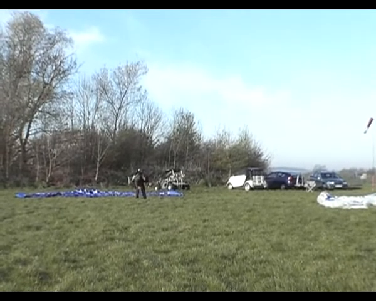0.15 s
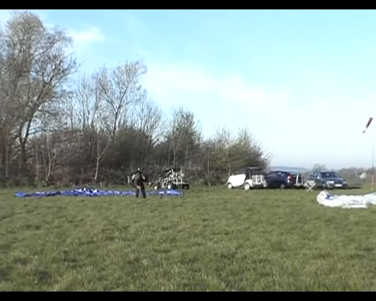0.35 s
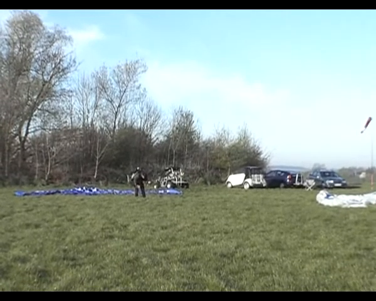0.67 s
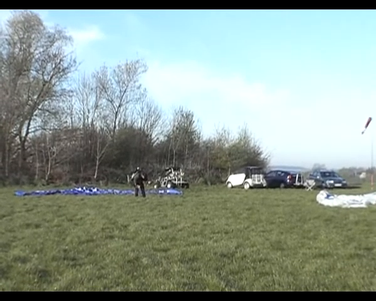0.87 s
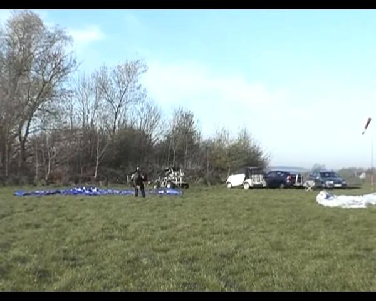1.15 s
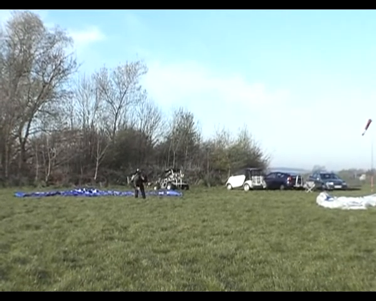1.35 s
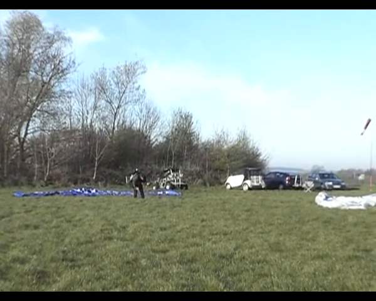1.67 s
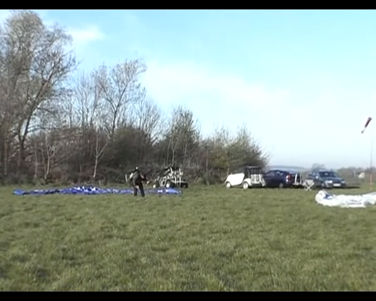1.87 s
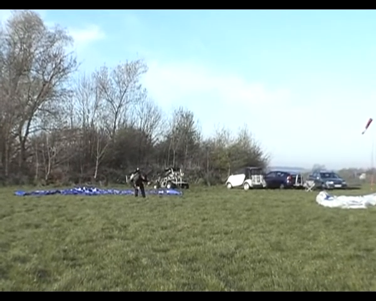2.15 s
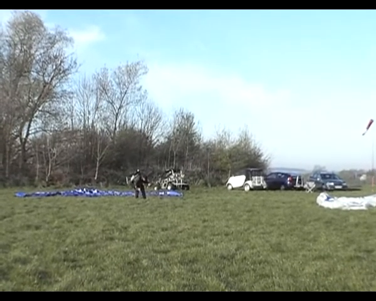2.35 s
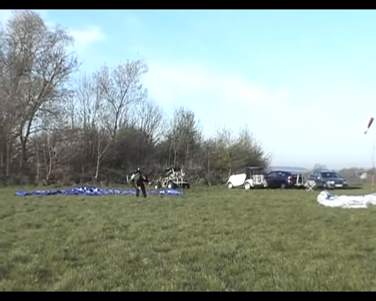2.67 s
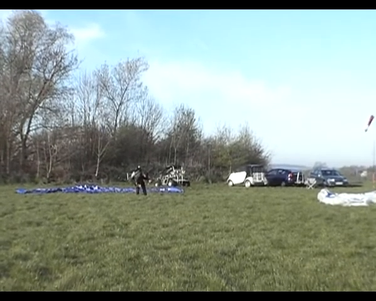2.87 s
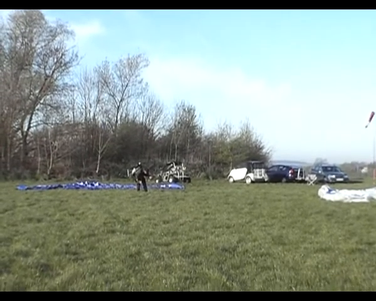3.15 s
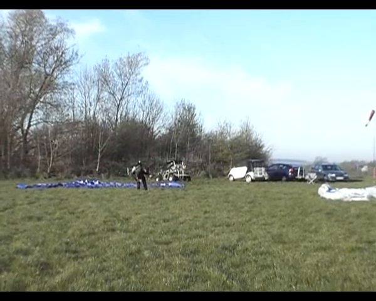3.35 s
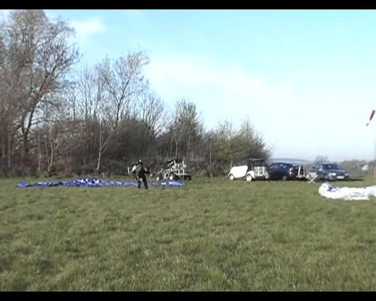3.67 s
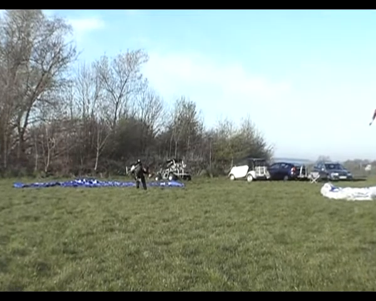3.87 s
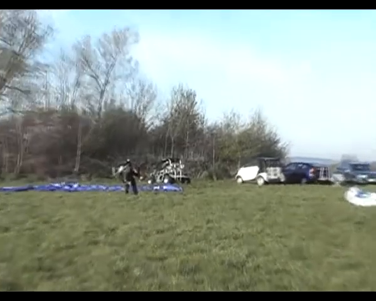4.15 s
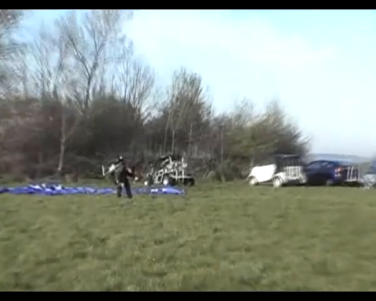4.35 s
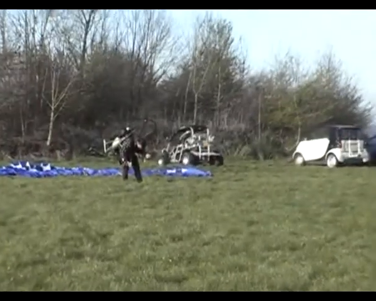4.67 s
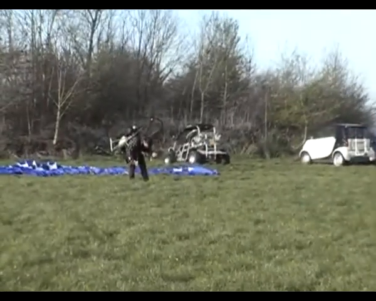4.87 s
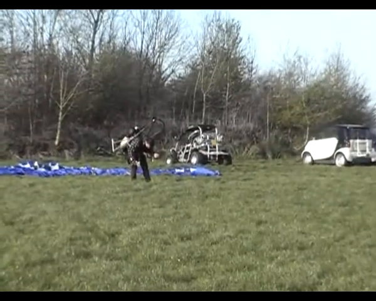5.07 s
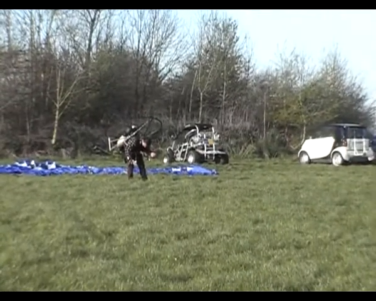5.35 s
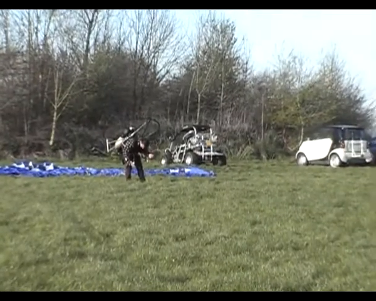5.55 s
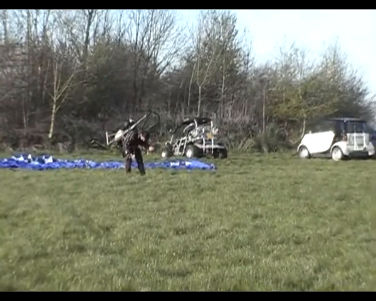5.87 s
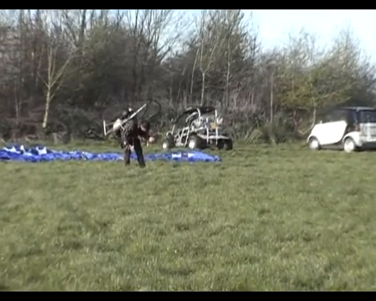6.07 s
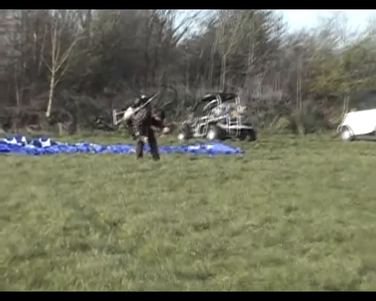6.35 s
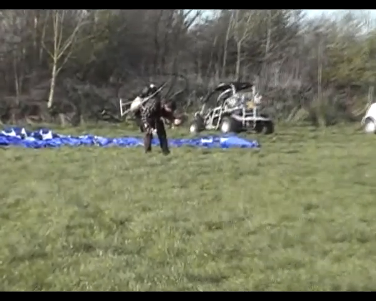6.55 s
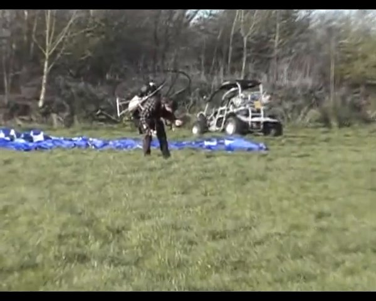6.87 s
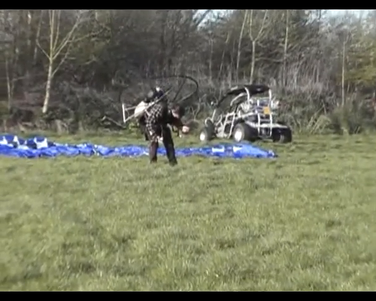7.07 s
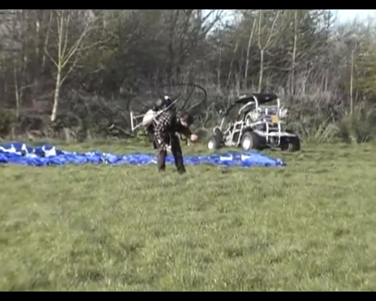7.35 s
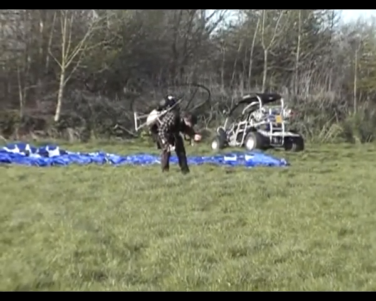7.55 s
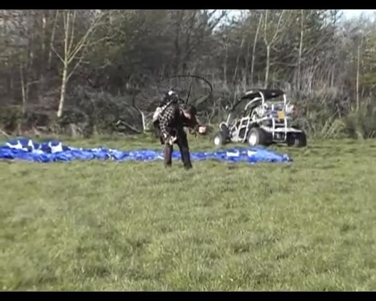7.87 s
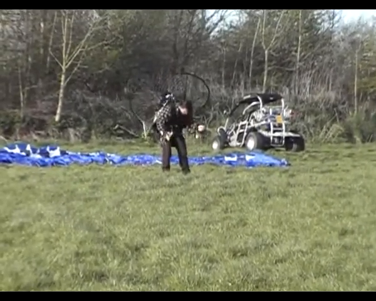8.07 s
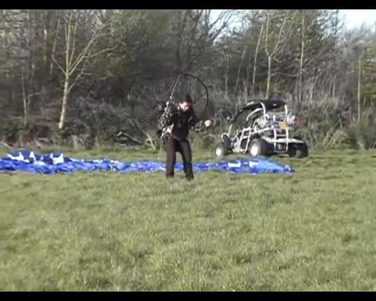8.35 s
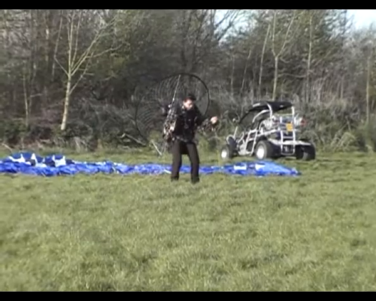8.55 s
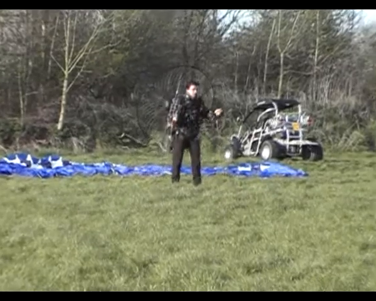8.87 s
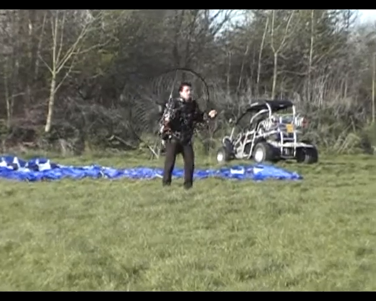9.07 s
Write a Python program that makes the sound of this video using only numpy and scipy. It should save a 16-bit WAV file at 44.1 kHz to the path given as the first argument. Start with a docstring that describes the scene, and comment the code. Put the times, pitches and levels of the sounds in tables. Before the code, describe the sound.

A small two-stroke paramotor buzzes across an open field, revs up in pushes, holds steady, then cuts out and rattles as it coasts down.

```python
"""The buzz of a two-stroke paramotor, chopped by the roar of its propeller, heard across an open field.
It runs at part throttle, is opened up in small pushes, held, then cut; the drive rattles as it coasts down.
One shaft speed drives it all: a stack of engine orders through exhaust resonances, tones at multiples of
the blade rate, noise throbbing with the shaft, a repeating gear growl, and struck modes for the rattle.
Behind lie propeller wash and the rush of the open air; a thin, resonant microphone housing colours all."""
import sys
import numpy as np
from scipy import signal
from scipy.fft import rfft, irfft, next_fast_len
from scipy.io import wavfile
from scipy.ndimage import uniform_filter1d

SR = 44100
rng = np.random.default_rng(int(sys.argv[2]) if len(sys.argv) > 2 else 0)


def log_audio(samples):
    """Write samples as a 16-bit WAV file to the path given in sys.argv[1]."""
    # one column per channel
    frames = np.atleast_2d(samples).T
    # limit to full scale, then quantise
    limited = np.clip(frames, -1, 1)
    pcm = np.round(limited * 32767).astype(np.int16)
    wavfile.write(sys.argv[1], SR, pcm)


N = 406591
TIME_S = np.arange(N) / SR

# drive: crank turns per propeller turn, blade count; crank speeds at which the throttle measure is 0 and 1
GEAR, BLADES = 3.6, 2
PART_HZ, FULL_HZ, CUT_S = 118, 157, 7.85
# crank speed (= firing rate) before the first push; fast and creeping response to each push
START_HZ, SPIN_UP_S, CREEP_S, CREEP_SHARE = 109.35, 0.326, 1.68, 0.172
# coasting: initial loss of speed; speed below which friction brakes more than air
BRAKE_HZ_PER_S, FRICTION_HZ = 233, 49.1
# acceleration at which the engine pulls hardest; floor between exhaust resonances
PULL_HZ_PER_S, VALLEY_DB = 13, -52
# level falls per halving of speed: unlit puffs; roar, hiss and gear growl only below their knees
PUMP_FALL_DB = 13
ROAR_KNEE_HZ, ROAR_FALL_DB = 114, 15
HISS_KNEE_HZ, HISS_FALL_DB = 127.2, 14
GEAR_KNEE_HZ, GEAR_FALL_DB = 132, 26
PUTTER_DEPTH = .15
# band limit of the microphone channel
TOP_HZ = 11900

# throttle pushes: (time [s], crank speed eventually gained [Hz])
THROTTLE_PUSHES = [(0, 5.89), (0.206, 3.69), (1.329, 1.7), (1.785, 11.06), (1.981, 16.36), (2.199, 10.82)]
# how far the pilot has turned the engine: (time [s], turn [0-1])
ENGINE_HEADING = [(4.4, 0), (5.4, 0.35), (6.7, 1)]
# drive of the exhaust, relative: (order [x firing rate], part throttle [dB], full throttle [dB],
# full throttle once turned [dB])
FIRING_ORDERS = [(1, -2, 4, 4), (2, 3, -5, -7), (3, -3, 6, 6), (4, 3, 2, -1), (5, 7, 0, 1), (6, -6, 0, -8),
                 (7, 4, 0, -2), (8, -5, -3, -4), (9, -7, -7, -1), (10, 2, 1, 6), (11, -8, -10, -6),
                 (12, 7, 0, 1), (13, 2, -4, 4), (14, 1, -3, -6), (15, -9, -1, 14), (16, -4, -2, 3),
                 (17, 4, -1, 3), (18, 1, -7, 0), (19, 0, -1, 10), (20, -3, -3, 1), (21, 4, 6, 6),
                 (22, -5, -4, 1), (23, 0, 2, -7), (24, -10, -1, -5), (25, -4, 7, 1), (26, 2, 8, -2),
                 (28, -1, 14, 6), (29, -3, 13, 14), (31, -4, 6, 0), (33, -12, 4, 5), (35, 6, 6, 7),
                 (37, 17, 3, -3), (39, 5, -2, -2), (40, 3, 5, 2), (42, -3, -2, 10), (44, -7, 0, 7),
                 (52, -3, 4, 1)]
# exhaust pipe and silencer resonances: (centre [Hz], width [Hz], gain [dB])
EXHAUST_MODES = [(296, 66, -37), (750, 100, -42.5), (1010, 180, -38), (1290, 150, -33.5), (1490, 110, -36),
                 (1750, 235, -25.2), (2195, 205, -26), (2540, 120, -30), (2845, 190, -30.5),
                 (3130, 110, -35), (3620, 520, -35), (5200, 700, -42), (6400, 1100, -42)]
# propeller hum, relative: (order [x blade rate], part throttle [dB], full throttle [dB])
BLADE_ORDERS = [(1, -54, -42.5), (2, -42, -30.5), (3.02, -42, -38.5), (3.98, -46.5, -48.5), (5, -56, -54.5),
                (6, -79, -47.5), (8, -67, -47.5), (12.1, -54, -47.5), (16.1, -59, -34.5), (22.1, -49, -43)]
# propeller roar, spectrum shape: (frequency [Hz], relative density [dB per Hz])
ROAR_SPECTRUM = [(30, -46), (90, -53), (160, -18.5), (250, -6), (330, -12.5), (420, -12.5), (650, -12),
                 (850, -9.5), (1350, 0.5), (2200, 0.5), (3200, -1), (4300, -3.5), (5500, -46), (9000, -65)]
# blade-tip hiss, spectrum shape: (frequency [Hz], relative density [dB per Hz])
HISS_SPECTRUM = [(2500, -33), (4300, -4), (5100, -1.5), (6500, -0.5), (7500, -4), (8800, -13.5),
                 (10000, -16.5), (11200, -24.5), (12300, -101)]
# blade-tip hiss over time: (time [s], relative level [dB])
HISS_LEVEL = [(0.1, -15), (0.55, -16.5), (2.8, -16), (4.75, -14.5), (6.73, -17), (7.8, -15.5)]
# gear growl, spectrum shape: (frequency [Hz], relative density [dB per Hz])
GROWL_SPECTRUM = [(100, -37), (240, 3), (420, -26), (800, -13), (1400, 1), (3000, 3), (6000, -24),
                  (9000, -22)]
# loudest knocks of the coasting drive: (time [s], relative peak [dB], favoured pitch [Hz])
DRIVE_KNOCKS = [(8.3126, -12, 3900), (8.351, -17, 2040), (8.428, -4.5, 3800), (8.4716, -6, 3670),
                (8.5778, 1, 3700), (8.586, -9, 3700), (8.6278, -11.5, 3300), (8.6692, -5, 3350),
                (8.7062, -10, 2900), (8.7276, -9, 6500), (8.7486, -18, 2260), (8.778, -14, 2690),
                (8.8463, -7, 3950), (8.854, -9, 3500), (8.8833, -10, 5730), (8.8982, -12, 4000),
                (8.9365, -8, 2200), (8.9905, -14.5, 2680), (9.0414, -12, 3610), (9.0718, -14, 4700),
                (9.1135, -9, 6250), (9.128, -14, 2400), (9.144, -15, 6200), (9.1611, -14, 3720)]
# modes of the drive casing: (nominal frequency [Hz], relative level [dB], t60 [s])
CASING_MODES = [(1400, 6.5, 0.034), (2116, -3, 0.033), (2700, -7, 0.031), (3570, -1.5, 0.019),
                (4130, 3, 0.01), (6120, 2.5, 0.012), (6660, 2, .012)]
# propeller wash, spectrum shape: (frequency [Hz], relative density [dB per Hz])
WASH_SPECTRUM = [(15, -13), (40, -6), (85, 3), (170, -6), (400, -16), (2000, -80)]
# open air, spectrum shape: (frequency [Hz], relative density [dB per Hz])
FIELD_SPECTRUM = [(30, -36), (90, -20), (160, -6.5), (250, -2), (340, -2), (450, -6.5), (620, -5),
                  (900, -1.5), (1400, 2.5), (3000, -19), (9000, -52)]
# stereo width: (frequency [Hz], side minus mid [dB])
STEREO_WIDTH = [(60, -46), (300, -55), (600, -61), (1140, -99), (2050, -27.5), (3700, -16.5), (5500, -17),
                (7000, -10.5), (8500, -2), (10000, 2.5), (12000, -10)]
# stereo balance: (time [s], left gain minus right gain [dB])
STEREO_PAN = [(0, -.7), (1.3, -.6), (2.2, 0), (7.8, 0), (8.2, -.8), (9.3, -.7)]
# microphone housing resonances: (centre [Hz], width [Hz], gain [dB])
HOUSING_MODES = [(300, 15, 0.5), (837, 34, 3.5), (1356, 88, 1), (1664, 213, 5), (2208, 162, 6.5),
                 (2855, 303, 6), (3560, 470, 4), (5960, 940, 4)]


def amp(db):
    """Decibels to gain."""
    return 10 ** (np.asarray(db) / 20)


def unit(x):
    """Scaled to rms 1."""
    return x / np.sqrt(np.mean(x ** 2) + 1e-20)


def along(points, hz):
    """(Hz, value) points read on a log frequency axis."""
    f, v = np.transpose(points)
    return np.interp(np.log(hz + 1), np.log(f + 1), v)


def curve(rows):
    """(s, value) points, one value per sample."""
    return np.interp(TIME_S, *np.transpose(rows))


def wobble(rate_hz):
    """Smooth random curve, rate_hz knots a second."""
    knots = rng.standard_normal(int(N * rate_hz / SR) + 4)
    fine = signal.resample_poly(knots, 8, 1)
    return np.interp(TIME_S * rate_hz * 8, np.arange(len(fine)), fine)


def filtered(x, response):
    """x through a complex response of frequency."""
    m = next_fast_len(N + SR // 4)
    return irfft(rfft(x, m) * response(np.fft.rfftfreq(m, 1 / SR)), m)[..., :N]


def shaped(x, spectrum):
    """x coloured by a spectrum table, rms 1."""
    return unit(filtered(x, lambda hz: amp(along(spectrum, hz))))


def noise(spectrum):
    """Coloured noise of rms 1."""
    return shaped(rng.standard_normal(N), spectrum)


def tone(turns):
    """Sine of rms 1 following a count of cycles, from a random start."""
    part = (turns - np.floor(turns)).astype(np.float32)
    return 2 ** .5 * np.sin(2 * np.pi * (part + rng.random()))


def ignition_on(t, fade_s):
    """1 before the cut, 0 after, with a linear fade centred on it."""
    return np.clip((CUT_S - t) / fade_s + .5, 0, 1)


def slowing_db(speed_hz, knee_hz, fall_db):
    """Level change as the shaft slows: none above the knee, -fall_db per halving below."""
    return fall_db * np.log2(np.minimum(speed_hz / knee_hz, 1))


def shaft_speed():
    """Crank speed [Hz]: lags behind each throttle push; after the cut, air drag and friction run it down."""
    driven = np.full(N, START_HZ)
    for push_s, gain_hz in THROTTLE_PUSHES:
        age_s = np.maximum(TIME_S - push_s, 0)
        fast_lag = (1 - CREEP_SHARE) * np.exp(-age_s / SPIN_UP_S)
        creep_lag = CREEP_SHARE * np.exp(-age_s / CREEP_S)
        driven += gain_hz * (1 - fast_lag - creep_lag)
    top_hz = driven[round(CUT_S * SR)]
    # braking by a constant plus the square of speed gives a tangent law
    drag = BRAKE_HZ_PER_S / (top_hz ** 2 + FRICTION_HZ ** 2)
    angle = np.arctan(top_hz / FRICTION_HZ) - drag * FRICTION_HZ * np.maximum(TIME_S - CUT_S, 0)
    coasting = FRICTION_HZ * np.tan(angle)
    return np.where(TIME_S < CUT_S, driven, np.maximum(coasting, 1))


def exhaust(hz):
    """Gain of pipe and silencer: steep resonances above a low floor."""
    peaks = sum(amp(db) / (1 + (2 * (hz - centre) / width) ** 4) for centre, width, db in EXHAUST_MODES)
    return amp(VALLEY_DB) + peaks


def chop(blade, depth, count=3):
    """Gain repeating with each blade that passes in front of the engine."""
    return 1 + depth * sum(tone(k * blade) / k ** .5 for k in range(1, count + 1))


def engine(crank, blade, speed_hz, throttle, level_db, chop_depth, low_chop_depth, waver_db, pump_db,
           count=52, size=6):
    """A buzz of engine orders, each flaring as it glides through an exhaust resonance."""
    t = np.linspace(0, TIME_S[-1], 400)
    heading = np.interp(t, *np.transpose(ENGINE_HEADING))
    gas = np.interp(t, TIME_S, throttle)
    rate_hz = np.interp(t, TIME_S, speed_hz)
    orders, *columns = np.transpose(FIRING_ORDERS)
    # under acceleration all orders are driven alike
    effort = np.clip(np.gradient(rate_hz, t) / PULL_HZ_PER_S, 0, 1) ** 2
    pull = uniform_filter1d(effort, size=7)
    ignition = ignition_on(t, 0.052)
    # without a spark the piston still pumps a few soft low orders
    pumping = amp(pump_db + slowing_db(rate_hz, FULL_HZ, PUMP_FALL_DB))
    buzz = np.zeros(N)
    for first in range(1, count, size):
        group = np.zeros(N)
        for k in range(first, first + size):
            part, full, turned = [amp(np.interp(k, orders, c)) for c in columns]
            open_drive = full + heading * (turned - full)
            held = part + gas * (open_drive - part)
            strength = (held + pull * (1 - held)) * exhaust(k * rate_hz)
            strength = strength * (ignition + (1 - ignition) * pumping / (1 + (k / 4) ** 4))
            # moving air makes each order waver
            drift = unit(uniform_filter1d(rng.standard_normal(len(t)), size=6))
            group += np.interp(TIME_S, t, strength * amp(waver_db * drift)) * tone(k * crank)
        buzz += group * chop(blade, low_chop_depth if first == 1 else chop_depth)
    # the buzz flutters in the propeller's wash
    return amp(level_db + 0.51 * wobble(25)) * buzz


def hum(blade, speed_hz, throttle, fall_db, count=22):
    """The blades' steady push on the air; fades quickly as the tips slow down."""
    coasting_db = -fall_db * np.log2(np.minimum(speed_hz / PART_HZ, 1)) ** 2
    orders, part_db, full_db = np.transpose(BLADE_ORDERS)
    slow, fast = np.zeros((2, N), np.float32)
    for k in range(1, count + 1):
        line = tone(k * blade)
        slow += float(amp(np.interp(k, orders, part_db))) * line
        fast += float(amp(np.interp(k, orders, full_db))) * line
    lines = amp(coasting_db + 0.55 * wobble(7.3)) * (slow + throttle * (fast - slow))
    # the microphone passes little of the hum below about 70 Hz
    return filtered(lines, lambda hz: 1 - 1 / (1 + (hz / 68) ** 8))


def rush(crank, blade, speed_hz, fade_db, roar_db, hiss_db, coast_db, flutter_db, throb, calm=0.23):
    """Blade turbulence: roar and hiss throb with engine and propeller, flutter in the uneven inflow."""
    running = ignition_on(TIME_S, 0.075)
    beat = 1 + running * throb * (tone(crank) + tone(2 * crank) + tone(3 * crank) + tone(2 * blade))
    # faint fast flutter near 100 Hz, independent of the shaft
    beat = beat + running * .08 * tone(100 * TIME_S + .1 * wobble(3))
    # coasting, each compression stroke makes the rush putter
    beat = beat + (1 - running) * PUTTER_DEPTH * (tone(crank) + tone(2 * crank))
    # the inflow calms once the engine stops pushing
    stir = calm + (1 - calm) * running
    shared_db = flutter_db * (wobble(240) + 0.68 * stir * wobble(70))
    roar_flutter = unit(beat * amp(shared_db + 1.24 * stir * wobble(120)))
    hiss_flutter = unit(beat * amp(shared_db + 0.93 * running * tone(blade) + 0.6 * wobble(260)))
    roar_level_db = fade_db + roar_db + coast_db * (1 - running)
    hiss_level_db = curve(HISS_LEVEL) + slowing_db(speed_hz, HISS_KNEE_HZ, HISS_FALL_DB)
    hiss_level_db = hiss_level_db + hiss_db + 1.1 * (0.5 - running)
    roar = amp(roar_level_db) * noise(ROAR_SPECTRUM) * roar_flutter
    hiss = amp(hiss_level_db) * noise(HISS_SPECTRUM) * hiss_flutter
    return roar + hiss


def gears(crank, fade_db, level_db, count=9, size=1024):
    """The same teeth meet every nine crank turns, so their small errors repeat as a gritty growl."""
    errors = signal.resample(rng.standard_normal(size), size * 8)
    grind = np.interp(crank / count % 1, np.arange(len(errors)) / len(errors), errors)
    return amp(level_db + fade_db) * shaped(grind, GROWL_SPECTRUM)


def casing_blow(t, centre_hz, crack, favour_db):
    """One knock: decaying casing modes, strongest near centre_hz, plus a short noise crack."""
    ring = np.zeros(len(t))
    # each blow lands on another tooth and favours other modes
    for hz, level_db, t60_s in CASING_MODES:
        mode_db = level_db - favour_db * abs(np.log2(hz / centre_hz)) + rng.normal(0, 3.4)
        turns = hz * rng.normal(1, 0.04) * t + rng.random()
        ring += amp(mode_db - 60 * t / t60_s) * np.sin(2 * np.pi * turns)
    return ring + crack * amp(-60 * t / 0.01) * rng.standard_normal(len(t))


def rattle(fade_db, knock_db, chatter_db, crack, favour_db=10, chatter_per_s=55):
    """Without load the gears knock in their backlash: a few loud blows amid quick light ones."""
    t = np.arange(SR // 25) / SR
    coast_s = TIME_S[-1] - CUT_S
    draws = rng.random((round(chatter_per_s * coast_s), 3))
    times_s = CUT_S + draws[:, 0] * coast_s
    levels_db = chatter_db + 0.24 * np.interp(times_s, TIME_S, fade_db) - 7 * draws[:, 1]
    chatter = zip(times_s, levels_db, 1300 * 9.3 ** draws[:, 2])
    knocks = [(s, db + knock_db, hz) for s, db, hz in DRIVE_KNOCKS]
    bright = signal.butter(2, [1200, 7500], "bandpass", fs=SR, output="sos")
    out = np.zeros(N + SR)
    for start_s, peak_db, centre_hz in knocks + list(chatter):
        blow = signal.sosfilt(bright, casing_blow(t, centre_hz, crack, favour_db))
        out[round(start_s * SR):][:len(t)] += amp(peak_db) * blow / np.abs(blow).max()
    return out[:N]


def wash(throttle, level_db, gust_db):
    """Low, lumpy rumble of the air that the propeller throws back."""
    running = np.maximum(ignition_on(TIME_S, .2), .15)
    lumps = unit(amp(gust_db * np.tanh(wobble(6.6) + wobble(17))))
    return amp(level_db + 12 * (throttle - 1)) * running * lumps * noise(WASH_SPECTRUM)


def field(level_db, rise_db):
    """Dull background rush of the open air, set louder after the engine cut."""
    return amp(level_db + rise_db * (1 - ignition_on(TIME_S, .2))) * noise(FIELD_SPECTRUM)


def stereo(mid):
    """Side is a quarter-turn-shifted copy of the mid, wavering in level, strongest in the treble; then a pan."""
    side = filtered(mid, lambda hz: 1j * amp(along(STEREO_WIDTH, hz))) * unit(0.94 + wobble(140))
    pan_db = curve(STEREO_PAN)
    return np.array([mid + side, mid - side]) * amp([pan_db / 2, -pan_db / 2])


def scene():
    """Engine, propeller and gears share one shaft speed; mostly the treble spreads in stereo."""
    speed_hz = shaft_speed()
    # no two firings come at quite the same point of the turn
    crank = np.cumsum(speed_hz * (1 + .0004 * wobble(10))) / SR + 0.00087 * wobble(70)
    blade = crank * BLADES / GEAR
    throttle = np.clip((speed_hz - PART_HZ) / (FULL_HZ - PART_HZ), 0, 1)
    fade_db = slowing_db(speed_hz, ROAR_KNEE_HZ, ROAR_FALL_DB)
    gear_fade_db = slowing_db(speed_hz, GEAR_KNEE_HZ, GEAR_FALL_DB)
    mid = engine(crank, blade, speed_hz, throttle, level_db=0.5, chop_depth=0.19, low_chop_depth=0.18,
                 waver_db=1.33, pump_db=3)
    mid = mid + hum(blade, speed_hz, throttle, fall_db=33)
    mid = mid + rush(crank, blade, speed_hz, fade_db, roar_db=-19.5, hiss_db=-2.0, coast_db=2.54,
                     flutter_db=1.0, throb=0.057)
    mid = mid + gears(crank, gear_fade_db, level_db=-24.5)
    mid = mid + rattle(fade_db, knock_db=-4, chatter_db=-13, crack=0.17)
    mid = mid + wash(throttle, level_db=-55, gust_db=13)
    mid = mid + field(level_db=-40.0, rise_db=6.0)
    return stereo(mid)


def housing(f):
    """Flat response with each microphone housing resonance lifted out of it."""
    response = 1
    for hz, width_hz, db in HOUSING_MODES:
        damping = 1j * f * width_hz
        response = response + (amp(db) - 1) * damping / (hz * hz - f * f + damping)
    return response


def record(dry):
    """The housing rings, peaks are rounded off, and nothing is kept above the band limit."""
    x = filtered(dry, housing)
    x = x / (1 + np.abs(x / .97) ** 8) ** (1 / 8)
    return filtered(x, lambda hz: hz < TOP_HZ)


dry = scene()
out = record(dry)
log_audio(out)
```